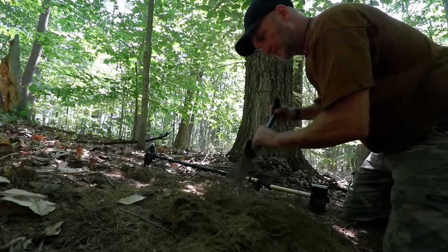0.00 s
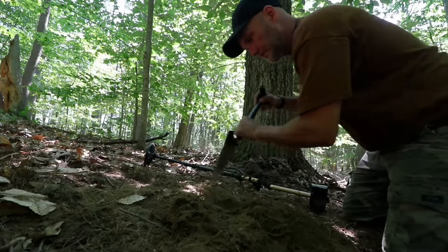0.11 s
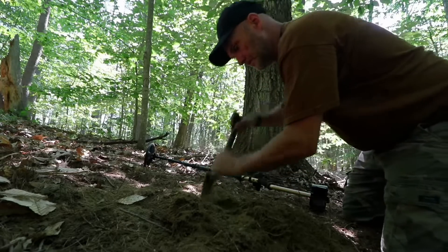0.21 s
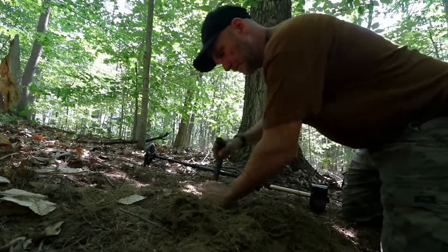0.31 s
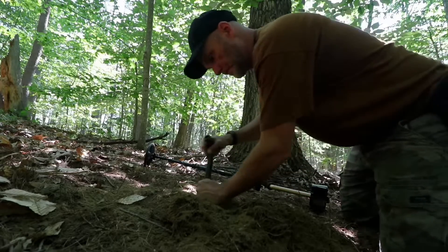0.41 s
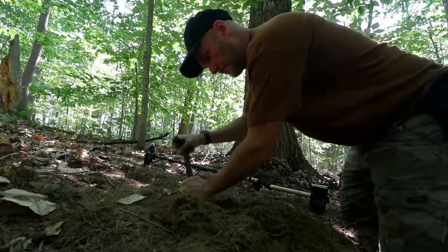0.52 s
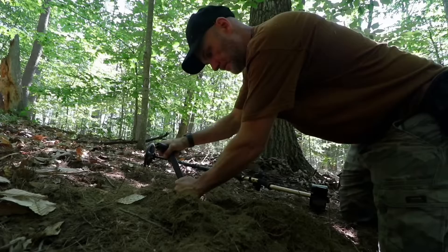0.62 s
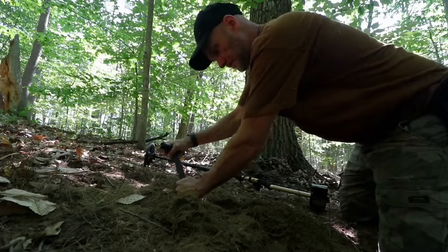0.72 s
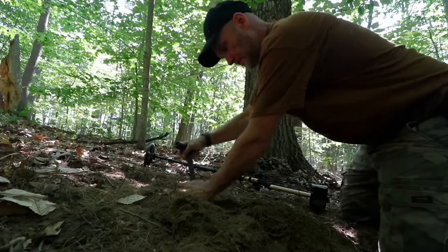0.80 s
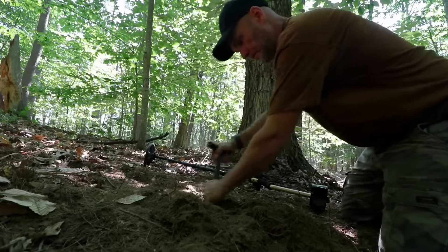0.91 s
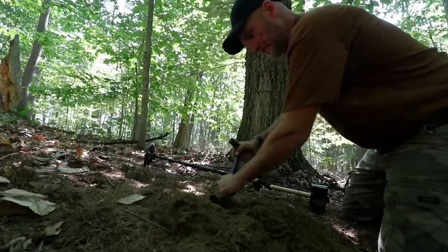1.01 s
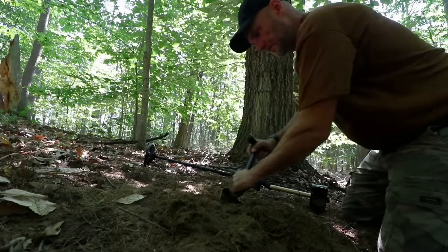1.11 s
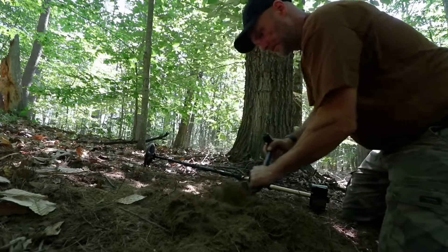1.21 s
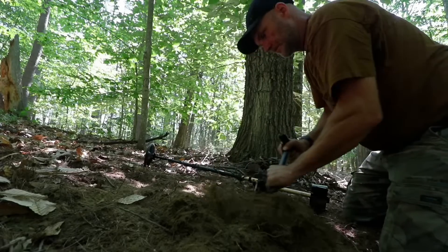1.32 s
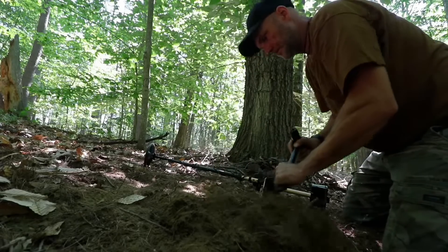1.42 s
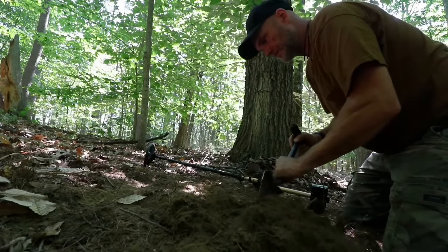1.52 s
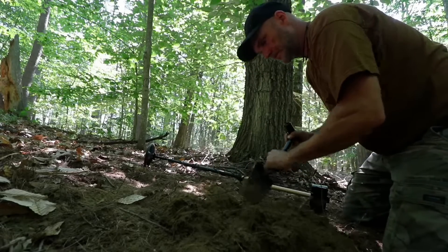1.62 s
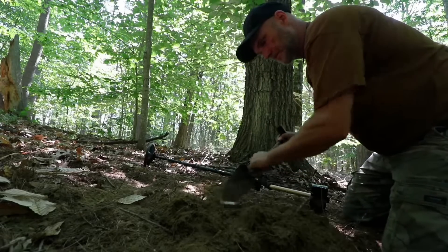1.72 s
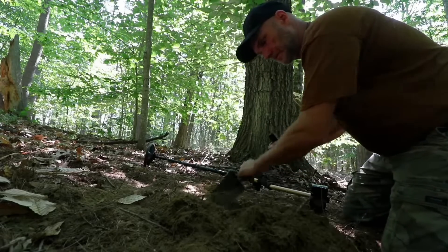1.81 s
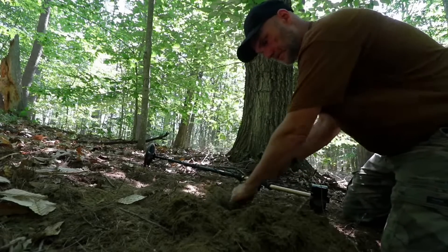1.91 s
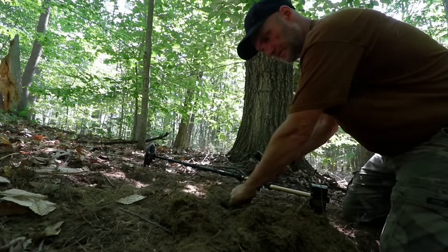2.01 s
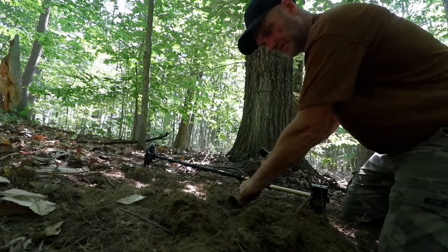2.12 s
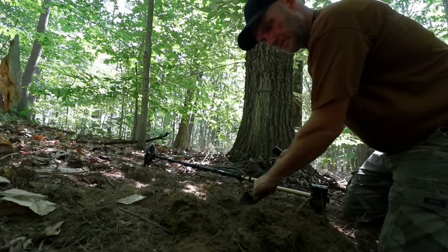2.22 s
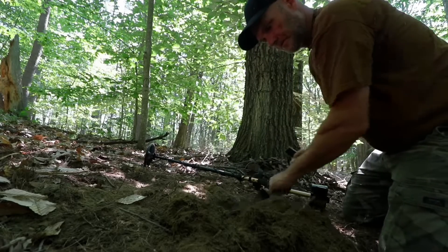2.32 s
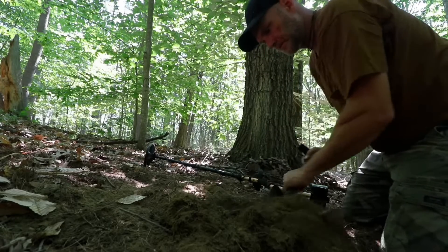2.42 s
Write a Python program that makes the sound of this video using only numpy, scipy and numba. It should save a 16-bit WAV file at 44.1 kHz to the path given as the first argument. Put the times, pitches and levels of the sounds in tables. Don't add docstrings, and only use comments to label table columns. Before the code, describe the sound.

A steel hand spade digs close by in gritty woodland soil. Faint edge touches lead to a very loud, clipped clank and thud at 0.25 s, then faint sliding soil. Stones knock from 0.8 s, with a scraping squeal near 1.1 and a stone hit at 1.17. Crumbs and pebbles patter around 1.4-1.7. A sharp glassy clank at 1.9 precedes scrapes, knocks and thuds until 2.4, over soft leaves and insects.

```python
import sys
import numpy as np
from scipy import signal
from scipy.fft import rfft, irfft
from scipy.io import wavfile
from scipy.ndimage import uniform_filter1d
from numba import njit

SR = 44100
rng = np.random.default_rng(int(sys.argv[2]) if len(sys.argv) > 2 else 0)


def log_audio(samples):
    frames = np.atleast_2d(samples).T
    limited = np.clip(frames, -1, 1)
    pcm = np.round(limited * 32767).astype(np.int16)
    wavfile.write(sys.argv[1], SR, pcm)


def linear_from_db(decibels):
    return 10 ** (np.asarray(decibels, float) / 20)


N = 110250
T = np.arange(N) / SR


def unit(x):
    return x / np.sqrt(np.mean(x ** 2))


def colour(x, points):
    hz, gain_db = np.array(points, float).T
    bin_hz = np.maximum(np.arange(len(x) // 2 + 1) * SR / len(x), 1)
    curve_db = np.interp(np.log(bin_hz), np.log(hz), gain_db, left=gain_db[0])
    return irfft(rfft(x) * linear_from_db(curve_db), len(x))


def reson(x, hz, width_hz):
    b, a = signal.iirpeak(min(hz, 0.45 * SR), hz / width_hz, fs=SR)
    return signal.lfilter(b, a, x)


def body(x, modes, tilt_db=0):
    out = 0
    for hz, width_hz, level_db in modes:
        gain = linear_from_db(level_db + tilt_db * np.log2(hz / 3000)) / np.sqrt(width_hz)
        out = out + gain * reson(x, hz, width_hz)
    return out


def walk(rate_hz):
    hold = int(SR / rate_hz)
    steps = np.repeat(rng.standard_normal(N // hold + 1), hold)
    return 1.42 * uniform_filter1d(uniform_filter1d(steps, hold), hold)[:N]


def grains(per_s, spread_db):
    hit = rng.random(N) < per_s / SR
    size = linear_from_db(spread_db * np.minimum(rng.exponential(size=N), 5))
    return hit * size * np.sign(rng.standard_normal(N))


def add(out, start_s, x):
    i = max(int(start_s * SR), 0)
    out[i:i + len(x)] += x[:N - i]


# hz, level_db
WOOD_SPECTRUM = [(25, -13), (80, 0), (300, -8), (1000, -10), (4500, -21.5), (8000, -33.5), (15500, -29)]
# hz, width_hz, level_db
CHORUS_BANDS = [(89.2, 11, -57), (160, 42, -58.5), (3427, 96, -56), ]


def wood():
    out = unit(colour(rng.standard_normal(N), WOOD_SPECTRUM)) * linear_from_db(-47 + 2.9 * walk(3.31))
    for hz, width_hz, level_db in CHORUS_BANDS:
        out = out + linear_from_db(level_db + 0.5 * walk(6.8)) * unit(reson(rng.standard_normal(N), hz, width_hz))
    wind_hz, wind_width_hz, wind_db, swing_db = 36, 38, -55, 10
    air = reson(rng.standard_normal(N), wind_hz, wind_width_hz)
    air = unit(reson(air, wind_hz, wind_width_hz))
    gust = np.exp(-((T - 0.45) / 0.27) ** 2) + 0.88 * np.exp(-((T - 2.3) / 0.2) ** 2)
    return out + air * linear_from_db(wind_db + 2 * swing_db * gust - swing_db)


# time_s, crumbs_db, clods_db
SOIL_MOVES = [(0, -59.5, -60.5), (.32, -52, -60), (0.549, -50.5, -36), (.72, -60, -60), (.8, -46, -40.5),
              (.95, -51, -45.5), (1.03, -47.5, -36), (1.2, -44, -35.5), (1.26, -51, -41.5),
              (1.405, -49.5, -46), (1.46, -35.5, -56), (1.57, -42.5, -59), (1.75, -58.5, -60),
              (1.87, -67, -67), (1.94, -37.5, -40), (2.03, -58, -47), (2.15, -48, -35),
              (2.32, -54.5, -45.5)]
# hz, level_db
CRUMB_SPECTRUM = [(400, -8), (1200, 1), (4000, 2.5), (7500, -4.5), (15500, -20)]
# hz, level_db
CLOD_SPECTRUM = [(40, -22), (150, 4.5), (280, 0), (900, -9.5), (2500, -21), (9000, -66)]


def soil():
    time_s, crumbs_db, clods_db = np.array(SOIL_MOVES).T
    grain_decay = np.exp(-T[:200] / 0.00021)
    spray = np.convolve(np.abs(grains(per_s=4000, spread_db=3.7)), grain_decay)[:N]
    crumbs = unit(colour((unit(spray) + 0.5) * rng.standard_normal(N), CRUMB_SPECTRUM))
    clods = unit(colour(grains(per_s=1000, spread_db=1.7), CLOD_SPECTRUM))
    crumbs = crumbs * linear_from_db(np.interp(T, time_s, crumbs_db) + walk(31.13))
    clods = clods * linear_from_db(np.interp(T, time_s, clods_db) + 2 * walk(25.16))
    return crumbs + clods


# start_s, peak_db, pitch_hz
PEBBLE_TICKS = [(.635, -53.5, 12500), (1.436, -39, 3200), (1.491, -35.5, 2410), (1.59, -43, 4500),
                (1.605, -49, 3600), (1.682, -42, 3500), (1.983, -37, 2110), (2.065, -47, 5340),
                (2.091, -40, 5400)]


def pebbles():
    out, t = np.zeros(N), T[:512]
    for start_s, peak_db, pitch_hz in PEBBLE_TICKS:
        width_hz = pitch_hz / 2.9
        burst = reson(rng.standard_normal(len(t)), pitch_hz, width_hz)
        burst = unit(reson(burst, pitch_hz, width_hz))
        add(out, start_s, linear_from_db(peak_db) * 2 * burst * np.exp(-t / 0.002))
    return out


# hz, width_hz, level_db
SING_MODES = [(2060, 420, 7.5), (3560, 300, 5), (3960, 58, 6.5), (4930, 130, -9), (5330, 26, -10),
              (6350, 84, -6), (6670, 73, -2), (7670, 130, -14), (7950, 52, -26), (8970, 94, -26)]
# time_s, level_db
SLIDE_LEVELS = [(.24, -62), (.29, -49), (.45, -52), (.62, -53), (.75, -72), (1.4, -65), (1.47, -42),
                (1.6, -51.5), (1.72, -56), (1.82, -71)]


def sliding_hum():
    time_s, level_db = np.array(SLIDE_LEVELS).T
    grit = unit(grains(per_s=2500, spread_db=3.9)) + rng.standard_normal(N)
    return unit(body(grit, SING_MODES)) * linear_from_db(np.interp(T, time_s, level_db) + 2.0 * walk(25.1))


def thud(hz, cycles):
    t = T[:SR // 8] * hz
    wave = np.sin(2 * np.pi * t * (1 - 0.038 * np.minimum(t, 4)))
    return wave * np.exp(-t * 2 / cycles) * np.minimum(t * 4, 1)


# start_s, level_db, pitch_hz, decay_cycles
GROUND_THUDS = [(0.234, -45, 300, 1), (.252, -13.5, 176, 4.8), (0.2826, -12.5, 118, 1.8),
                (1.012, -18.5, 340, 4.2), (1.172, -16, 284, 1.8), (1.897, -23.5, 251, 2.7),
                (1.9105, -19.5, 423, 2.7), (2.098, -20.5, 190, 2.3), (2.229, -19.5, 250, 3.4),
                (2.244, -22.5, 88, 1.8), (1.4008, -21.5, 337, 1.6), (2.42, -28.5, 160, 1.7)]


def thuds():
    out = np.zeros(N)
    for start_s, level_db, pitch_hz, cycles in GROUND_THUDS:
        add(out, start_s, linear_from_db(level_db) * thud(pitch_hz, cycles))
    return out


# hz, level_db
CRACK_SPECTRUM = [(200, -0.5), (1000, 3), (3000, 7), (7000, -10.5), (15000, -13)]


def crack(decay_s, tilt_db=0):
    t = T[:2048]
    x = colour(rng.standard_normal(len(t)), CRACK_SPECTRUM)
    x = colour(x, [(2000, 0), (16000, 3 * tilt_db)])
    decay = np.exp(-t / decay_s) + 0.14 * np.exp(-t / decay_s / 5)
    return 0.5 * unit(x) * decay * np.minimum(t / 0.00025, 1)


# start_s, peak_db, pitch_hz, thud_db (relative to peak_db)
STONE_KNOCKS = [(0.151, -33.5, 950, -21), (0.8, -20.5, 850, -18), (0.819, -19, 834, -9.5),
                (0.847, -23.5, 3310, -16.5), (0.851, -27, 1830, -17), (0.868, -21.5, 2060, -26),
                (1.011, -19.5, 730, -12.5), (1.026, -13, 3050, -10.5), (1.03, -12.5, 713, -21.5),
                (1.043, -21.5, 3140, 0), (1.204, -27, 2260, -8), (1.4, -25, 670, -17),
                (1.513, -22.5, 2200, -33), (2.062, -25.5, 1550, -32), (2.082, -30, 2200, -31),
                (2.091, -16, 1640, -15.5), (2.177, -22.5, 1550, -8), (2.222, -18, 1680, -6.5),
                (2.232, -21, 783, -23)]


def knocks():
    out, t, decay_s = np.zeros(N), T[:2048], 0.0041
    for start_s, peak_db, pitch_hz, thud_db in STONE_KNOCKS:
        tick = np.sin(2 * np.pi * pitch_hz * t) * np.exp(-t / decay_s) * np.minimum(t / 0.00058, 1)
        splinter = linear_from_db(-6) * crack(1.7 * decay_s, tilt_db=3 * np.log2(pitch_hz / 4000))
        add(out, start_s, linear_from_db(peak_db) * (0.53 * tick + splinter))
        thud_hz = 216 * rng.uniform(0.71, 1.7)
        add(out, start_s, linear_from_db(peak_db + thud_db + 4.5) * thud(thud_hz, cycles=1.8))
    return out


# hz, width_hz, level_db
GRATE_MODES = [(1594, 22, -5), (2210, 74, -1), (2500, 58, -13), (3200, 65, -12), (3520, 41, -6),
               (5400, 400, -10), (6080, 280, -9.5), (8130, 140, -14.5), (9530, 280, -14.5),
               (11030, 250, -19), (12900, 330, -17)]
SQUEAL_MODES = [(1640, 39, -8), (2606, 43, 0.5), (3237, 78, 3), (3440, 55, -8), (5260, 360, -13),
                (6000, 240, -14), (8180, 190, -10), (9400, 150, -19), (9990, 200, -19), (11300, 300, -29),
                (13100, 300, -17)]
DRAG_MODES = [(1590, 280, 1), (2200, 230, -1), (3180, 200, -3), (4080, 37, -24), (4500, 43, -24),
              (5400, 180, -11), (6550, 31, -23), (8070, 170, -12.5), (9980, 110, -16), (11200, 330, -18),
              (12100, 110, -25), (13300, 160, -19)]
# start_s, length_s, level_db, tilt_db_per_octave
GRATE_STROKES = [(1.035, 0.021, -38, 0), (1.512, 0.07, -40.5, -2), (1.88, 0.037, -38, 2.5),
                 (2.219, 0.022, -41.5, 2.5), (2.263, 0.015, -37, 9.5)]
SHARD_STROKES = [
    (1.077, 0.036, -26.5, 0.1),
]
SOIL_STROKES = [(2.051, 0.032, -44, .1), (2.078, 0.043, -36.5, 0.12), (2.11, 0.084, -39, .1),
                (2.164, 0.019, -40, 2.5), (0.999, 0.054, -40, .1), (1.11, 0.1, -43, .1)]


def grating():
    out, t = np.zeros(N), T[:SR // 8]
    grit = unit(grains(per_s=2500, spread_db=7)) + 1.2 * rng.standard_normal(N)
    grit = grit * linear_from_db(2.4 * walk(200))
    kinds = ((GRATE_MODES, GRATE_STROKES), (SQUEAL_MODES, SHARD_STROKES), (DRAG_MODES, SOIL_STROKES))
    for modes, strokes in kinds:
        for start_s, length_s, level_db, tilt_db in strokes:
            i = int(start_s * SR)
            x = grit[i:i + len(t)]
            steel = body(x, modes, tilt_db)
            steel = steel / steel[:int(length_s * SR)].std()
            hiss = unit(colour(x, [(500, -2 * tilt_db), (4000, 0), (15000, 2 * tilt_db - 30)]))
            fade = np.clip(np.minimum(t / 0.0058, (length_s - t) / 0.0057), 0, 1)
            add(out, start_s, linear_from_db(level_db) * (steel + linear_from_db(-17.5 + tilt_db) * hiss) * fade)
    return out


def ring(modes, damp=1, tilt_db=0, choke_s=1):
    hz, level_db, t60_s = np.array(modes, float).T[:, :, None]
    t = T[:SR // 3]
    phase = 2 * np.pi * rng.random((len(hz), 1))
    steps = np.repeat(rng.standard_normal((len(hz), 120)), 128, axis=1)
    rattle = uniform_filter1d(steps, size=128, axis=1)[:, :len(t)]
    gain = linear_from_db(level_db + tilt_db * np.log2(hz / 5000) + 2.5 * rattle)
    decay = np.exp(-np.log(1000) * t * damp / t60_s - (t / choke_s) ** 3)
    wave = np.sin(2 * np.pi * hz * t + phase + 0.1 * rattle)
    return (gain * decay * wave).sum(axis=0) * np.minimum(t / 0.00024, 1)


# hz, level_db, t60_s
FREE_MODES = [(1648, -12, 0.15), (2366, -7.5, 0.1), (2800, -7, 0.071), (3130, -4.5, 0.069),
              (4010, -2, 0.082), (4570, 5.5, 0.023), (5150, 2, 0.029), (6520, 6.5, 0.03),
              (7900, -0.5, 0.028), (9300, -2, 0.04), (11060, -9, 0.036), (14400, -14, 0.05),
              (5900, -2, 0.0206)]
BURIED_MODES = [(716, -14.5, 0.096), (1320, -11, 0.072), (1550, -2.5, 0.11), (2210, -9.5, 0.044),
                (2437, -3.5, 0.071), (2646, -11.5, 0.04), (3446, -6, 0.098), (4570, -1, 0.05),
                (980, -20, 0.019), (6650, -16, 0.052), (3980, -27, .04), (5790, -13.5, 0.033),
                (6150, -12, .03), (5130, -21, .03)]
STONE_MODES = [(470, -3.5, 0.046), (760, -4.5, 0.025), (1334, -0.5, 0.035), (2370, 3, 0.039),
               (3470, 0, 0.021), (4000, -17, .1), (5150, -4.5, 0.025), (6630, -5.5, 0.026),
               (8164, -9, 0.026), (11500, -16.5, .025), ]
EDGE_MODES = [(2500, -8.5, 0.5), (5000, -6, 0.19), (6690, -4, 0.5), (7830, -7, 0.15), (8100, -15.5, 0.4),
              (9000, -9, .2), (10060, -13, .15), (11950, -16, 0.24), (13910, -18, 0.11)]
# start_s, ring_db, crack_db, damping_factor
FREE_BLOWS = [
    (0.2386, -7.5, 6.5, 1.24),
    (0.24, -13, 0.5, 6.1),
    (0.2475, -5.5, 4.5, 2.05),
    (0.2592, -50, -8, 2.6),
    (0.2642, -52, -15, 3.3),
]
BURIED_BLOWS = [
    (1.9101, -10.5, -3, 0.84),
    (1.9152, -16, -5, 0.7),
    (1.9338, -30, -11, 1.4),
    (1.9468, -29, -16.5, 1.3),
]
STONE_BLOWS = [
    (1.1714, -15.5, -14.5, 1.87),
]
# start_s, level_db, tilt_db_per_octave
EDGE_TOUCHES = [
    (.001, -52, -19),
    (.050, -50.5, 5),
    (0.064, -53, 7.5),
    (1.545, -41.5, -13),
]


def blade():
    out, choke_s = np.zeros(N), 0.02
    kinds = ((FREE_MODES, FREE_BLOWS, 0), (BURIED_MODES, BURIED_BLOWS, -3), (STONE_MODES, STONE_BLOWS, 0))
    for modes, blows, crack_tilt_db in kinds:
        for start_s, ring_db, crack_db, damp in blows:
            add(out, start_s, linear_from_db(ring_db) * ring(modes, damp, choke_s=choke_s))
            add(out, start_s, linear_from_db(crack_db) * crack(0.0022, crack_tilt_db))
    for start_s, level_db, tilt_db in EDGE_TOUCHES:
        add(out, start_s, linear_from_db(level_db) * ring(EDGE_MODES, 0.71, tilt_db, choke_s=3 * choke_s))
    return out


def trunk_echo(near):
    t, echo_db, t60_s = T[:SR // 2], -31.5, 0.43
    tail = rng.standard_normal(len(t)) * np.exp(-np.log(1000) * t / t60_s) * (t > 0.006)
    tail = tail / np.sqrt(np.sum(tail ** 2))
    return linear_from_db(echo_db) * signal.fftconvolve(colour(near, [(800, -17), (3000, 0.0)]), tail)[:N]


def stereo(mid):
    treble = signal.butter(2, 9000, "high", fs=SR, output="sos")
    side = linear_from_db(-25) * signal.sosfilt(treble, mid * np.sign(walk(2000)))
    side = side + linear_from_db(-38) * np.roll(colour(mid, [(500, -2), (2000, -5.5)]), 300)
    return np.array([mid + side, mid - side])


# hz, gain_db
GROUND_DIP = [(6800, -0.55), (7500, -2), (8200, -0.75)]


def scene():
    near = blade() + knocks() + thuds() + grating()
    dug = colour(near + trunk_echo(near) + soil(), GROUND_DIP)
    return stereo(dug + wood() + pebbles() + sliding_hum())


@njit
def follow(x, attack, release):
    e, out = 0., np.empty(len(x))
    for i in range(len(x)):
        e += (x[i] - e) * (attack if x[i] > e else release)
        out[i] = e
    return out


def band_limit(x):
    return signal.sosfilt(signal.butter(12, 15650, fs=SR, output="sos"), x)


def record(dry):
    duck_from_db, duck_ratio, attack_s, release_s = -19.5, 1.564, 0.0031, 0.073
    peak = follow(np.abs(dry).max(axis=0), 1 / (attack_s * SR), 1 / (release_s * SR))
    gain = np.minimum(linear_from_db(duck_from_db) / (peak + 1e-9), 1) ** (1 - 1 / duck_ratio)
    x = np.clip(dry * gain, -1, 1)
    x = signal.sosfilt(signal.ellip(8, 0.2, 40, 15700, fs=SR, output="sos"), x)
    return band_limit(np.clip(x, -1, 1))


dry = scene()
out = record(dry)
log_audio(out)
```